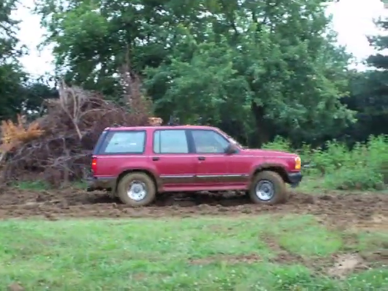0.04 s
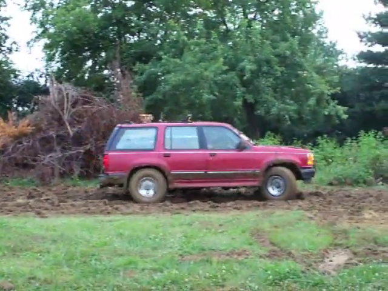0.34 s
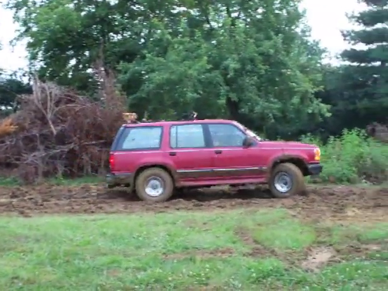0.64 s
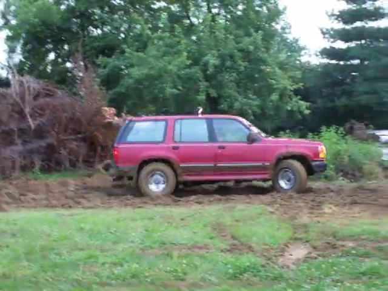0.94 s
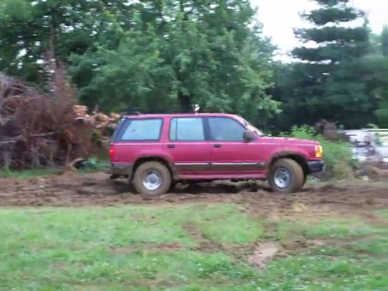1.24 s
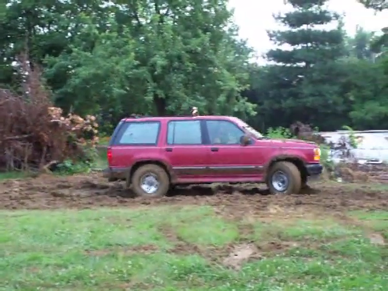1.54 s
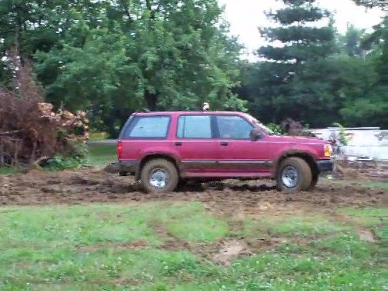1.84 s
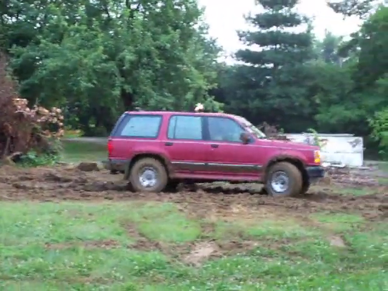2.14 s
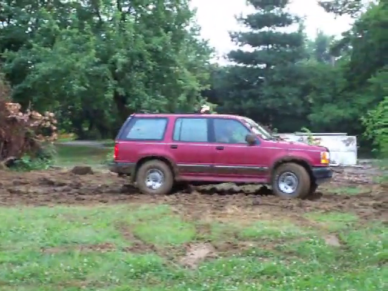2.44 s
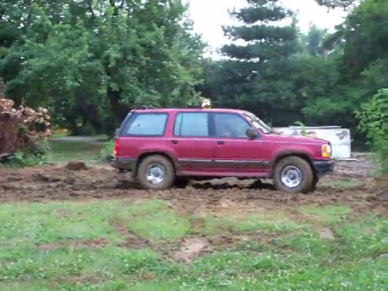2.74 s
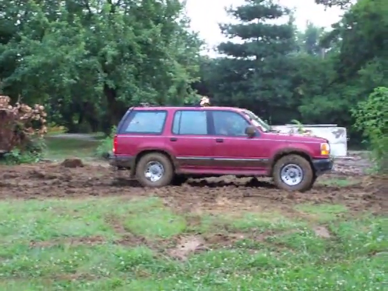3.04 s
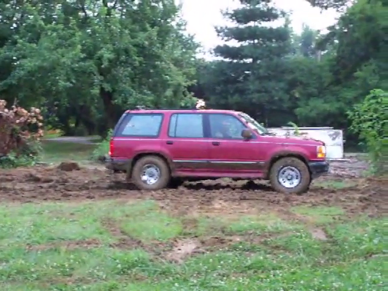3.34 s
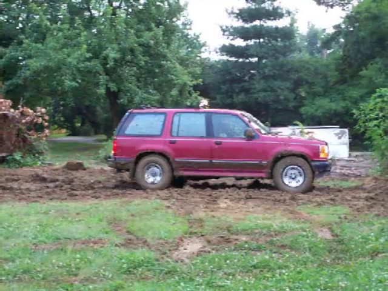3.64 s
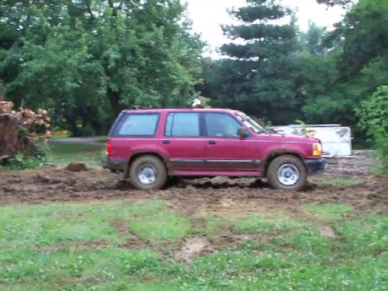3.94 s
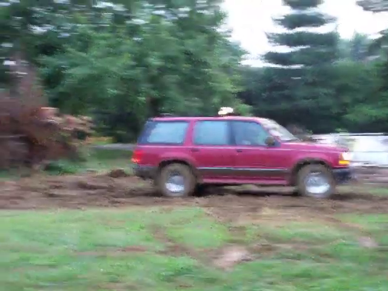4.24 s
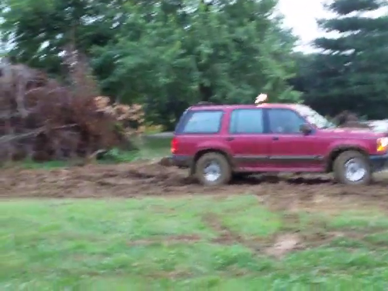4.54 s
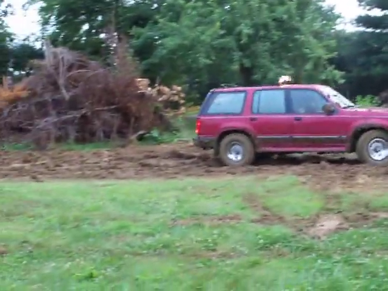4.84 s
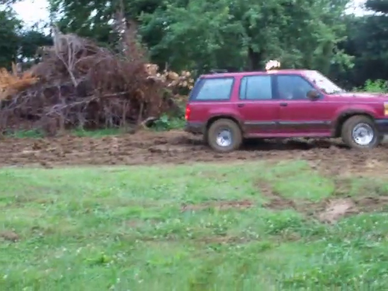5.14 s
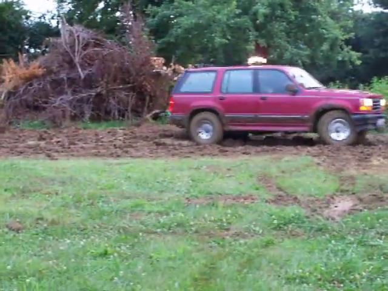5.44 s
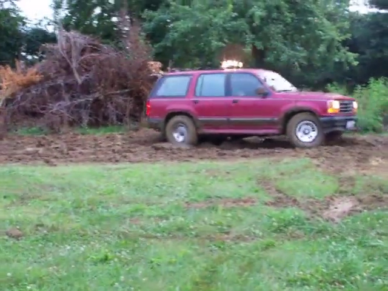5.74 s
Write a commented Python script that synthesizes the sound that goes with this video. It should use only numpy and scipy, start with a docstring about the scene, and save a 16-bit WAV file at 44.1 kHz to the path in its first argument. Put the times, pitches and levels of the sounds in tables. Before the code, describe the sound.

An SUV stuck in mud revs, chugs, then holds high revs with a throbbing, raspy exhaust and hissing tyre spray before easing off.

```python
"""A muddy field, with an SUV ploughing through it some way off. Its six-cylinder engine revs, drops to
a lumpy chug, then is held at high revs and released. The cylinders fire unevenly, so the exhaust throbs
once a cycle (one round of all six) and its rasp and hiss come in puffs. Spinning tyres throw wet spray,
and the ground reflects the high sounds."""
import sys
import numpy as np
from scipy import signal
from scipy.fft import rfft, irfft, next_fast_len
from scipy.io import wavfile
from scipy.ndimage import uniform_filter1d, map_coordinates

SR = 44100
rng = np.random.default_rng(int(sys.argv[2]) if len(sys.argv) > 2 else 0)


def materialize(psi):
    """Save the field psi as 16-bit PCM at rate SR to the path in sys.argv[1].

    A 1-D psi becomes a single channel; in a 2-D psi each row is a channel.
    """
    bounded = np.clip(np.atleast_2d(psi).T, -1, 1)
    quanta = np.round(bounded * 32767).astype(np.int16)
    wavfile.write(sys.argv[1], SR, quanta)


N = 264159
T = np.arange(N) / SR
COARSE_T = np.linspace(0, T[-1], N // 32)  # fewer time steps, for slow changes

# engine speed, in cycles a second: t/s, f/Hz
SPEED = [(0, 41.8), (0.58, 57.18), (0.76, 56.09), (1.02, 30.42), (1.26, 18.49), (1.5, 14.06), (2.02, 20.48),
         (2.58, 19.91), (2.96, 25.63), (3.3, 26.56), (3.56, 39.49), (3.76, 42.61), (4.2, 43.32),
         (4.45, 42.27), (5.22, 42.11), (5.5, 39.88), (5.74, 24.08), (5.99, 17.64)]
# how hard the engine works, as the level of its exhaust boom: t/s, level/dB
LOAD = [(0, -17.5), (.28, -14.5), (.73, -13), (.85, -28), (1, -25.7), (1.33, -46), (1.55, -31.5),
        (2.1, -23.5), (2.7, -22), (3.26, -25), (3.45, -10.5), (3.62, -13.5), (4.95, -13), (5.47, -16),
        (5.59, -30.5), (5.83, -39.5), (5.99, -31.5)]
# the engine and tailpipe swing towards the listener and away again: t/s, level/dB
FACING = [(0, -11), (.7, -2.5), (3.1, 0.5), (5.99, -2.5)]
# uneven firing makes "orders", tones at multiples of engine speed: order, chug/dB, roar/dB, scream/dB
ORDERS = [(1, -32.5, -23.5, -25), (2, -1.5, 0.5, 2), (3, -19, -3, -0.5), (4, 1.5, -2.5, 4),
          (5, 2.5, -2.5, -6), (6, -15, -11.5, -9), (7, -1.5, -2, -4.5), (8, -5.5, -15, -14)]
# what the silencer lets through: f/Hz, level/dB
SILENCER = [(20, -13.5), (40, -10.5), (60, 5.5), (80, 2), (102, -1.5), (125, 1.5), (150, -5.5),
            (178, -12.5), (218, -10), (260, -21), (305, -18), (420, -28), (560, -48)]
# each cylinder's share, in the order they fire: burble/dB, rasp/dB, hiss/dB
CYLINDERS = [(-7.5, -3, 4), (-1, -3, 1.5), (-3, -1.5, 1.5), (-6, -4, 0), (-2, 1, 1), (-10, -2.5, 0.5)]
# how loud the pipe burbles: t/s, level/dB
BURBLE_LEVEL = [(0, -31), (.17, -37.5), (.38, -33.5), (.7, -32.5), (1, -33), (1.2, -44.5), (1.5, -51),
                (1.85, -45.5), (2.18, -34), (2.72, -33.5), (3.28, -34.5), (3.47, -26), (3.62, -31.5),
                (4.7, -32.5), (5, -28), (5.42, -26.5), (5.62, -37), (5.99, -47)]
# the tone colour of each noise: f/Hz, level/dB
BURBLE_SPECTRUM = [(20, -23), (45, -2.5), (80, -4.5), (130, 7), (190, -1), (250, -5), (330, -6.5),
                   (420, -7.5), (490, -17), (700, -45), (1500, -66)]
RASP_SPECTRUM = [(300, -42), (480, -5.5), (620, 3.5), (780, 4), (1000, -2.5), (1300, -8), (1650, -11),
                 (2100, -11.5), (2600, -14.5), (3500, -20.5), (8000, -48)]
HISS_SPECTRUM = [(300, -25), (800, -2.5), (1400, -1), (1900, 0.5), (2600, -6), (3300, -0.5), (4300, 2),
                 (5500, 0), (7400, 0.5), (8100, -7.5), (8800, -25.5)]
SPRAY_SPECTRUM = [(500, -31), (800, -7), (1150, 3), (1450, -2.5), (1950, 3.5), (2300, -1), (3300, -0.5),
                  (4200, 0.5), (5000, -1.5), (6000, -3), (7400, -2.5), (8100, -9.5), (8800, -28.5)]
AIR_SPECTRUM = [(20, 5.5), (50, 10), (120, 14), (300, -3.5), (600, -22.5), (2000, -20.5), (8000, -49)]
# "modes", the pitches at which the pipe, engine bay and growl ring: f/Hz, width/Hz, level/dB
PIPE_MODES = [(151, 20, -4.5), (218, 32, -10), (302.8, 17, 5.5), (343, 36, -2.5), (378.6, 35, -3.5),
              (418.5, 33, -6.5)]
BAY_MODES = [(1495, 200, -4), (1720, 160, -1.5), (1875, 160, -5), (2458, 190, -5.5), (3120, 440, -8.5)]
GROWL_MODES = [(330.5, 65, -0.5)]
# higher tones that drone at high revs: order, level/dB
DRONE_ORDERS = [(9, -0.5), (10, -1.5), (12, -13), (14, -15), (15, -13), (16, -11), (17, -10.5), (19, -13),
                (20, -11)]
# how each layer follows the engine: base level/dB, then dB added per dB of effort, speed and facing
RASP_RULE = (-39, 0.17, 1.24, 0.89)
DRONE_RULE = (-41.5, 0.36, 0.5, 0)
BAY_RULE = (-48, -0.04, 1.4, 1.6)
HISS_RULE = (-46.5, 0.62, 0.28, 1.08)
# the tyres lose their grip: start t/s, stop t/s, spray level/dB at the held revs
SPINS = [(0, 0.671, -41.5), (2.398, 5.458, -59)]
# how much sound bounces off the ground: t/s, share
BOUNCE = [(0, 0.21), (.9, 0.57), (2, 0.26), (3.5, 0.073), (5.99, 0.13)]
# short barks as the engine takes the load: t/s, half length/s, f/Hz, width/Hz, level/dB
BARKS = [(0.334, 0.029, 1880, 250, -39.5), (0.485, 0.056, 1940, 308, -40.5), (3.487, 0.17, 424, 49.4, -33)]
# the drive line hums while the wheels spin fast: start t/s, coasting from t/s, f/Hz, level/dB
HUMS = [(0.724, 0.797, 256.5, -33.5), (4.505, 5.351, 275, -37)]
# faint chirps: t/s, length/s, start f/Hz, end f/Hz, level/dB
SQUEAKS = [(2.5, .035, 4950, 4650, -61), (2.54, 0.049, 5050, 4330, -57), (2.7, 0.046, 4550, 4350, -58),
           (3.015, .04, 5080, 4550, -54.5), (3.065, .025, 4780, 4500, -59)]
# fuel firing late, in the pipe: t/s, level/dB
POPS = [(3.454, -27), (3.488, -25), (3.567, -24.5), (4.294, -26)]

HELD_HZ, HELD_DB = 42, -13  # speed and load at the held revs
CHUG_HZ, ROAR_HZ, SCREAM_HZ = 24.6, 30.5, 45.4  # engine speeds for a full chug, roar and scream


def amp(db):
    """Turn decibels into a number to multiply by."""
    return 10 ** (np.asarray(db) / 20)


def unit(x):
    """Scale a sound so its average strength (rms) is 1."""
    return x / np.sqrt(np.mean(x ** 2) + 1e-20)


def curve(rows):
    """Join (time, value) points with straight lines."""
    return np.interp(T, *np.transpose(rows))


def wobble(rate):
    """A smooth curve through `rate` random points a second."""
    points = rng.standard_normal(int(N * rate / SR) + 4)
    return np.interp(T, COARSE_T, map_coordinates(points, [COARSE_T * rate]))


def noise():
    """White noise: an even hiss."""
    return rng.standard_normal(N)


def filtered(x, response):
    """Multiply each frequency in a sound by response(hz)."""
    size = next_fast_len(N + SR // 2)
    return irfft(rfft(x, size) * response(np.fft.rfftfreq(size, 1 / SR)), size)[:N]


def coloured(x, spectrum):
    """Give a sound a tone colour, at strength 1."""
    f, db = np.transpose(spectrum)
    return unit(filtered(x, lambda hz: amp(np.interp(np.log(hz + 1), np.log(f), db))))


def resonances(modes, hz):
    """How something that rings answers each frequency."""
    return sum((-1) ** k * amp(db) * 1j * hz * width / (centre ** 2 - hz ** 2 + 1j * hz * width)
               for k, (centre, width, db) in enumerate(modes))


def ringing(x, modes):
    """Pass a sound through the modes twice, ending at strength 1."""
    return unit(filtered(x, lambda hz: resonances(modes, hz) ** 2))


def follow(rule, state):
    """A layer's level in dB from the engine's effort, speed and facing."""
    return rule[0] + sum(slope * db for slope, db in zip(rule[1:], state))


def puffs(cycle, cylinder_db, depth_db, scatter_db, contrast=1):
    """Each firing lets out a puff of swirling gas, at that cylinder's strength."""
    firing = cycle * len(cylinder_db)
    index = np.arange(int(firing[-1]) + 2)
    size_db = np.resize(cylinder_db, len(index)) + scatter_db * rng.standard_normal(len(index))
    pulse_db = np.interp(firing, index, size_db) + depth_db * np.cos(2 * np.pi * firing)
    return noise() * amp(contrast * pulse_db)


def exhaust_boom(cycle, speed, load_db):
    """Firing tones slide through the silencer and peak together once a cycle."""
    fall_hz_per_s = uniform_filter1d(-np.gradient(speed) * SR, size=SR // 8)
    falling = np.clip(fall_hz_per_s / 45, 0, 1)  # quickly falling revs keep the roar
    chug = (1 - falling) * np.clip((ROAR_HZ - speed) / (ROAR_HZ - CHUG_HZ), 0, 1)
    scream = np.clip((speed - HELD_HZ) / (SCREAM_HZ - HELD_HZ), 0, 1)
    lag = 1.38 * np.clip((speed / speed.max() - .75) / 0.16, 0, 1)  # upper tones trail at high revs
    skew_rad, delay_s = 0.7, 0.0032  # a slow puff is followed by suction and leaves the silencer late
    hz, pass_db = np.transpose(SILENCER)
    tone, power = 0, 0
    for order, chug_db, roar_db, scream_db in ORDERS:
        firing_db = roar_db + chug * (chug_db - roar_db) + scream * (scream_db - roar_db)
        gain = amp(firing_db + np.interp(order * speed, hz, pass_db))
        shift = chug * (skew_rad - 2 * np.pi * order * speed * delay_s) - lag * (order > 2)
        phase = 2 * np.pi * order * cycle + shift + 0.0078 * order * wobble(25)
        tone += gain * amp(0.061 * order * wobble(28)) * np.cos(phase)
        power += gain ** 2 / 2
    return amp(load_db) * tone / np.sqrt(power)


def exhaust_gas(cycle, speed, burble_db, rasp_db):
    """Each puff burbles in the silencer and rasps at the pipe's mouth, choppier at high revs."""
    burble_share, rasp_share, _ = np.transpose(CYLINDERS)
    burble = puffs(cycle, burble_share, depth_db=0.5, scatter_db=-0.5, contrast=0.34)
    rasp = puffs(cycle, rasp_share, depth_db=-2, scatter_db=-2, contrast=speed / speed.max())
    return (amp(burble_db) * coloured(burble, BURBLE_SPECTRUM),
            amp(rasp_db) * coloured(rasp, RASP_SPECTRUM))


def pipe_ring(cycle, speed, level_db, jitter_s=0.0005, scatter_db=3.4):
    """Once a cycle the strongest firing kicks the pipe into ringing; the silencer softens the kick."""
    times = np.interp(np.arange(1, int(cycle[-1])), cycle, T)
    time_chance, size_chance = rng.standard_normal((len(times), 2)).T
    rate = np.interp(times, T, speed)
    times = times - .002 + jitter_s * time_chance * rate / speed.max()
    sizes = amp(scatter_db * size_chance) / np.sqrt(rate)
    kicks = np.bincount(np.clip(times * SR, 0, N - 1).astype(int), sizes, N)
    ring = filtered(kicks, lambda hz: resonances(PIPE_MODES, hz) / (1 + (hz / 450) ** 8))
    return amp(level_db) * unit(ring)


def drone(cycle, speed, level_db):
    """Faint wavering tones stand out of the rasp near the held revs."""
    tones = sum(amp(db + 2.7 * wobble(9.2)) * np.cos(2 * np.pi * order * cycle + 0.44 * wobble(9))
                for order, db in DRONE_ORDERS)
    nearness = np.exp(-((speed - HELD_HZ) / 6) ** 2)
    return amp(level_db) * nearness * tones


def engine_bay(cycle, level_db):
    """Clattering valves ring the metal around the engine."""
    clatter = puffs(cycle, np.transpose(CYLINDERS)[2], depth_db=1, scatter_db=2.5)
    return amp(level_db) * ringing(clatter, BAY_MODES)


def growl(speed, level_db, lag_s=0.031, climb_hz_per_s=50):
    """Gas swirls in the pipe, louder the faster the revs climb."""
    memory = np.exp(-1 / (lag_s * SR))
    climb = np.maximum(np.gradient(speed) * SR, 0)
    smooth_climb = signal.lfilter([1 - memory], [1, -memory], climb)
    return amp(level_db) * smooth_climb / climb_hz_per_s * ringing(noise(), GROWL_MODES)


def exhaust_hiss(cycle, level_db):
    """The exhaust hisses in step with the firings."""
    gas = puffs(cycle, np.transpose(CYLINDERS)[2], depth_db=2, scatter_db=1.5)
    return amp(level_db) * coloured(gas, HISS_SPECTRUM)


def tyre_spray(cycle, speed_db, rise_db_per_s=42, fall_db_per_s=82, drops_per_s=900):
    """Wet mud and grass fly off the tyres, more at speed, pulsing with each turn of the engine."""
    spin = np.zeros(N)
    for start, stop, db in SPINS:
        before, after = np.maximum(start - T, 0), np.maximum(T - stop, 0)
        spin += amp(db - rise_db_per_s * before - fall_db_per_s * after)
    spatter = unit(noise() * (rng.random(N) < drops_per_s / SR))
    chop_db = np.clip(4.5 - 1.2 * speed_db, 1.2, 4.5) * np.cos(4 * np.pi * cycle - 2.5)
    flurries = amp(chop_db + 0.95 * wobble(180) + 0.43 * wobble(27))
    splash = coloured(noise() + amp(-13) * spatter, SPRAY_SPECTRUM)
    return spin * amp(1.94 * speed_db) * flurries * splash


def ground_bounce(x, delay_s=0.001326, phase_rad=2.36, fade_hz=5330):
    """An echo off the soft soil weakens some pitches; the rough surface scatters the highest away."""
    def soil(hz):
        return np.exp(1j * (phase_rad - 2 * np.pi * hz * delay_s)) / (1 + (hz / fade_hz) ** 6)
    return x + curve(BOUNCE) * filtered(x, soil)


def field_air(whine_hz=4310):
    """A low outdoor rumble, a soft hiss and a faint, thin whine."""
    whine = amp(-67 + 1.7 * wobble(7)) * np.sin(2 * np.pi * whine_hz * T + .7 * wobble(30))
    rumble = amp(-38.5) * coloured(noise(), AIR_SPECTRUM)
    hiss = amp(-59.5) * coloured(noise(), HISS_SPECTRUM)
    return rumble + hiss + whine


def barks():
    """Swirling gas rings around one pitch, swelling and fading."""
    out = np.zeros(N)
    for peak_s, half_length, centre_hz, width_hz, db in BARKS:
        swell = np.exp(-((T - peak_s) / half_length) ** 2)
        out += amp(db) * swell * ringing(noise(), [(centre_hz, width_hz, 0)])
    return out


def drive_line_hum(rise_db_per_s=58, sink_hz_per_s2=410, fade_db_per_s2=41):
    """The shafts to the wheels hum: the note swells, holds, then sinks ever faster as they coast."""
    out = np.zeros(N)
    for start, release, held_hz, db in HUMS:
        coast = np.maximum(T - release, 0) ** 2
        hz = np.maximum(held_hz - sink_hz_per_s2 * coast, 0)
        level_db = db - rise_db_per_s * np.maximum(start - T, 0) - fade_db_per_s2 * coast
        phase = 2 * np.pi * np.cumsum(hz) / SR
        out += amp(level_db + 0.53 * wobble(20)) * np.sin(phase + 0.093 * wobble(8.1))
    return out


def squeaks():
    """Thin, wavering, falling chirps."""
    out = np.zeros(N)
    for start, length, start_hz, end_hz, db in SQUEAKS:
        progress = np.clip((T - start) / length, 0, 1)
        hz = start_hz + progress * (end_hz - start_hz) + 70 * wobble(250)
        out += amp(db) * np.sin(np.pi * progress) * np.sin(2 * np.pi * np.cumsum(hz) / SR)
    return out


def pops(rise_s=0.0018, decay_s=0.076):
    """Fuel fires late in the pipe: a dull knock with some bite."""
    bursts = sum(amp(db - 60 * np.maximum(T - start, 0) / decay_s) * np.clip((T - start) / rise_s, 0, 1)
                 for start, db in POPS)
    knock = coloured(noise(), BURBLE_SPECTRUM)
    bite = .5 * coloured(noise(), RASP_SPECTRUM) + .1 * coloured(noise(), HISS_SPECTRUM)
    return bursts * (knock + bite)


def level_dip(start_s=4.31, depth_db=-2.5, recovery_s=.4):
    """The level drops just after the last pop and creeps back."""
    since = np.maximum(T - start_s, 0)
    return amp(depth_db * np.clip(since / .012, 0, 1) * np.exp(-since / recovery_s))


def scene():
    """One turning engine keeps its layers in step; rasp, hiss and spray also bounce off the ground."""
    speed, load_db, burble_db = curve(SPEED), curve(LOAD), curve(BURBLE_LEVEL)
    cycle = .2 + np.cumsum(speed) / SR  # running count of engine cycles
    effort_db, speed_db = load_db - HELD_DB, 20 * np.log10(speed / HELD_HZ)  # both 0 at the held revs
    state = effort_db, speed_db, curve(FACING)
    burble, rasp = exhaust_gas(cycle, speed, burble_db, follow(RASP_RULE, state))
    ring = pipe_ring(cycle, speed, level_db=burble_db - 7.5 - 0.21 * speed_db)
    bass = exhaust_boom(cycle, speed, load_db) + ring + burble
    middle = drone(cycle, speed, follow(DRONE_RULE, state))
    middle += engine_bay(cycle, follow(BAY_RULE, state))
    middle += growl(speed, level_db=-35 + 0.6 * effort_db)
    hiss = exhaust_hiss(cycle, follow(HISS_RULE, state))
    treble = ground_bounce(rasp + hiss + tyre_spray(cycle, speed_db))
    mix = bass + middle + treble + barks() + drive_line_hum() + pops() + squeaks() + field_air()
    return level_dip() * mix[None]


def record(dry):
    """Cut away the very highest sounds."""
    top_hz = 8950
    return filtered(dry[0], lambda hz: hz < top_hz)[None]


dry = scene()
out = record(dry)
materialize(out)
```